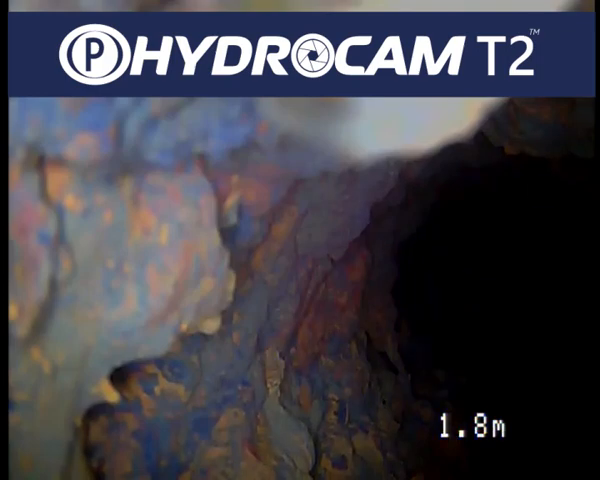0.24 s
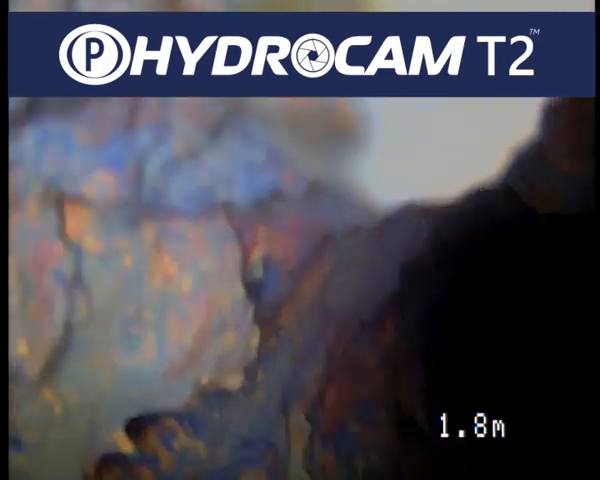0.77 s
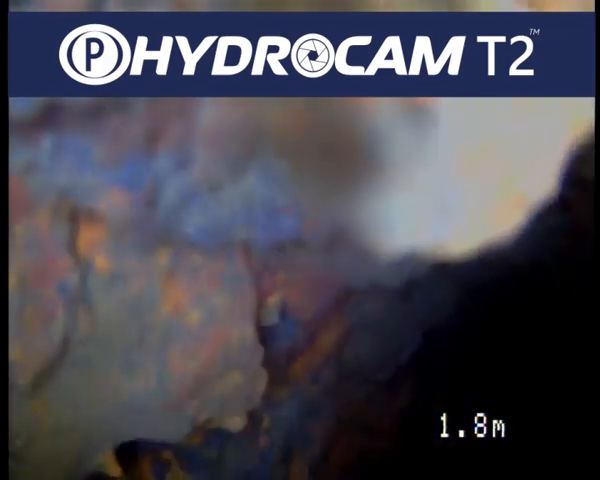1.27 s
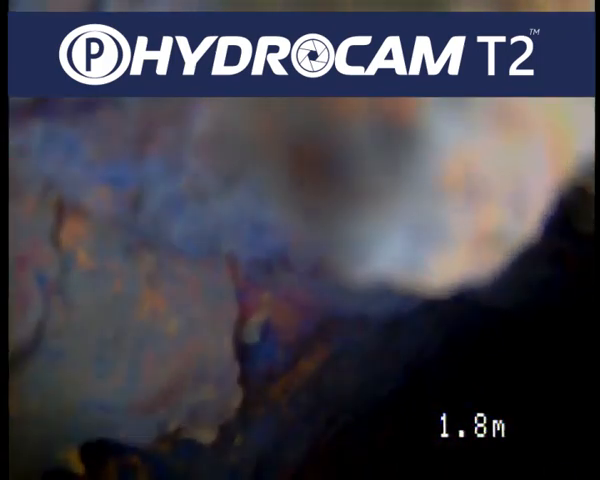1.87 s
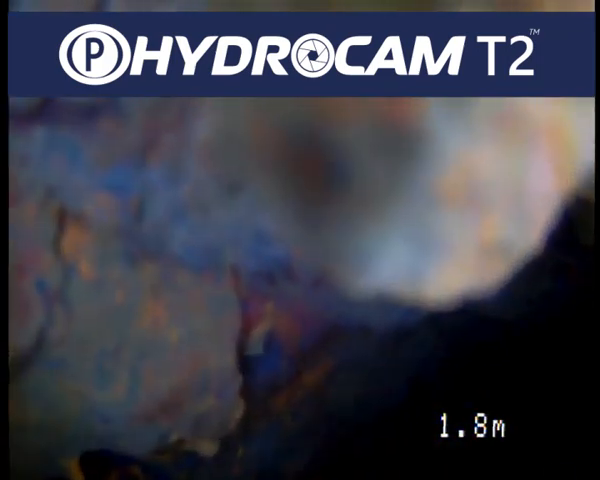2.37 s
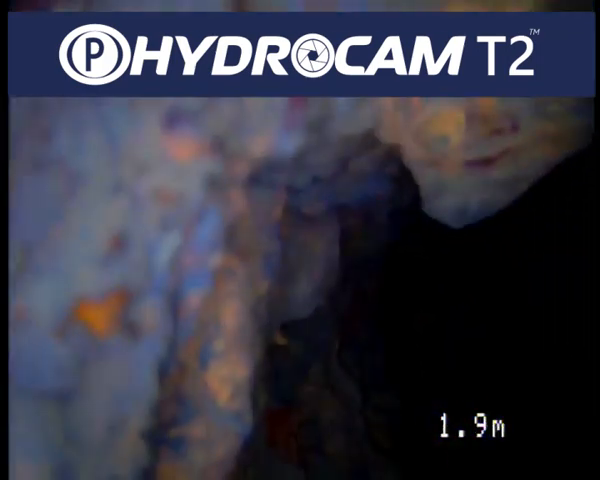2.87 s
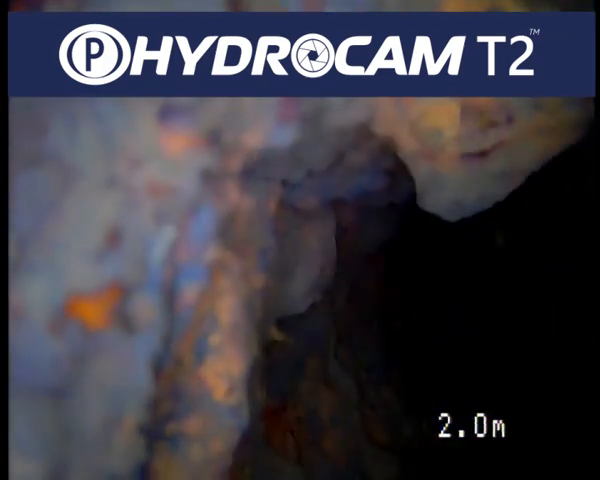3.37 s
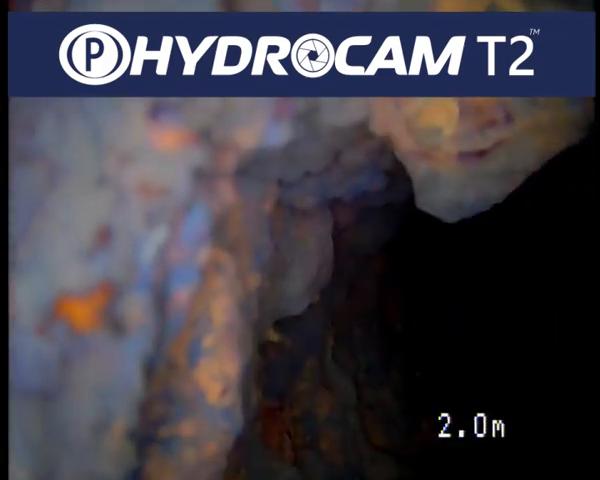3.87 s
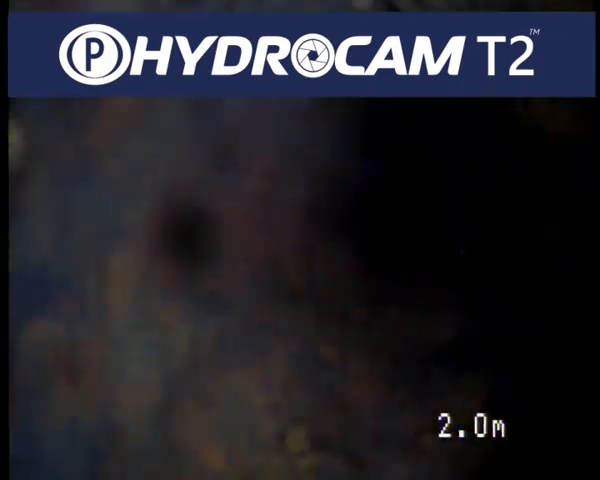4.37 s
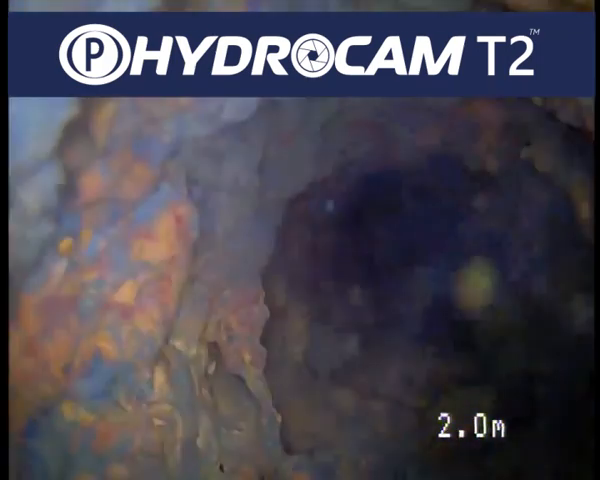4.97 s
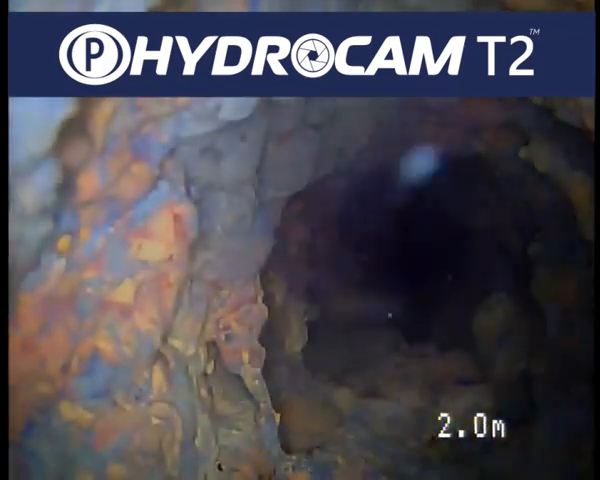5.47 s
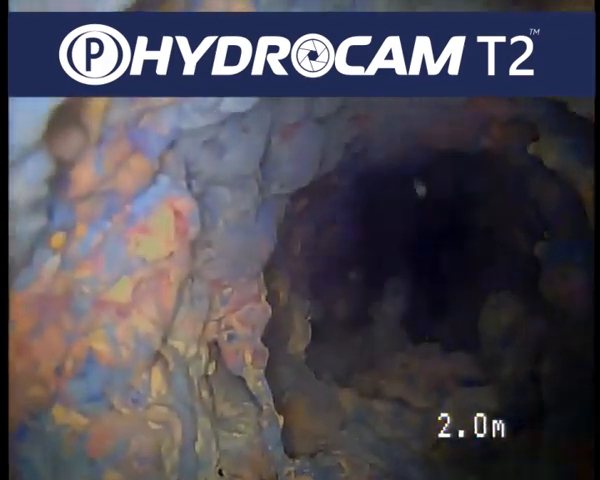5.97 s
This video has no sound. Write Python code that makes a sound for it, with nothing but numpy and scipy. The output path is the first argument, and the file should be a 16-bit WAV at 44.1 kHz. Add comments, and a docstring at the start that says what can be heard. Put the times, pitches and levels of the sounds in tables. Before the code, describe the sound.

A microphone on a probe pushed through a rough, rusty pipe picks up muffled low knocks, soft thumps and faint cable rumble. The blows are dry and woody, with a very short dull echo. After scattered light taps comes a rapid rattle of bumps, a pause, then the loudest crash, clipped and crunchy, with scraping grit and a stuttering slip. Hollow hiss remains, ended by a small bump and squeak.

```python
"""Dull knocks over a faint hollow hush come first: an inspection camera head is shoved through a corroded pipe.
Blows are damped rings, cracks and sharp overload ticks are filtered noise bursts, thumps are spring swings.
Sliding is a stream of ringing grains with dull grit and gliding squeaks; the cable is low coloured noise.
The bore returns a short diffuse echo, its air column resonates, and the microphone overloads on hard blows."""
import sys
import numpy as np
from scipy import signal
from scipy.fft import rfft, irfft
from scipy.io import wavfile

SR = 44100
rng = np.random.default_rng(int(sys.argv[2]) if len(sys.argv) > 2 else 0)


def int16_out(signal):
    """Quantize to a 16-bit WAV file."""
    q = np.round(np.clip(np.atleast_2d(signal).T, -1, 1) * 32767)
    wavfile.write(sys.argv[1], SR, q.astype(np.int16))


N = 274869
TIME = np.arange(N) / SR

# Head striking the crust, with a crack or, in the two rows at 8000 Hz and above, a sharp overload tick.
# Each row: start in seconds, ring peak in dB, ring frequency in Hz, ring t60 in seconds,
# crack or tick peak in dB, crack or tick frequency in Hz.
CRUST_KNOCKS = [(0.0944, -26.5, 388, 0.0074, -62, 1500), (0.2323, -34.5, 383, 0.0075, -62, 1500),
                (0.3442, -29.5, 457, 0.0035, -55, 990), (0.89, -22, 417, 0.0028, -50, 950),
                (0.9683, -18, 450, 0.0043, -58, 3500), (1.0216, -32, 500, 0.0022, -40, 1970),
                (1.025, -25.5, 736, 0.0017, -41, 1790), (1.3781, -25.5, 507, 0.0026, -47, 3300),
                (1.428, -27, 367, 0.0063, -54, 1500), (1.6598, -13, 455, 0.0057, -31, 1820),
                (1.6635, -32.5, 800, 0.0077, -49, 1100), (1.9485, -33, 510, 0.0031, -43, 2220),
                (2.0109, -27, 430, 0.0067, -42, 1030), (2.476, -26, 385, 0.0064, -55, 1500),
                (2.5531, -25.5, 427, 0.0088, -40.5, 1690), (2.6018, -5, 358, 0.0038, -28.5, 1440),
                (2.6228, -14, 590, 0.0066, -24, 1760), (2.7345, -19.5, 600, 0.0026, -55, 1500),
                (2.7444, -21, 506, 0.011, -41, 1500), (2.7533, -11, 390, 0.0059, -23, 1520),
                (2.771, -15, 860, 0.004, -26.5, 1500), (2.8048, -14, 562, 0.0044, -50, 1500),
                (2.8111, -5.5, 400, 0.0022, -34.5, 2550), (2.8262, -19.5, 604, 0.0026, -39, 1880),
                (2.8731, -15, 480, 0.004, -57, 1500), (2.8813, -3.5, 427, 0.0019, -28, 2950),
                (4.226, -28, 500, 0.0079, -60, 1500), (4.2975, -22.5, 520, 0.0043, -47, 1800),
                (4.3288, -23, 500, 0.0013, -18.5, 2290), (4.3318, 1.5, 603, 0.0037, -25, 1500),
                (4.3357, -7.5, 850, 0.00388, -14, 1800), (4.3612, -8, 427, 0.0078, -24, 8000),
                (4.3711, 0.5, 447, 0.0046, -8.5, 1900), (4.3765, -18, 418, 0.0035, -28, 1680),
                (4.3843, -10.5, 416, 0.0033, -33, 8500), (4.396, -16, 346, 0.0058, -38, 2000),
                (4.43, -29, 600, 0.005, -42, 2200), (4.447, -26, 545, 0.0027, -37, 1390),
                (4.4745, -14.5, 540, 0.0015, -40, 2680), (4.479, -7.5, 750, 0.003, -16.5, 1800),
                (4.505, -21, 630, 0.0052, -46, 1500), (4.5523, -12, 553, 0.0056, -30.5, 1750),
                (4.586, -19.5, 644, 0.002, -52, 1600), (4.8086, -22.5, 444, 0.0067, -55, 1500),
                (4.8269, -15, 465, 0.005, -45, 3000), (4.8539, -19.5, 470, 0.0034, -61, 1500),
                (6.2164, -17, 570, 0.0022, -46, 3000)]
# Modes of the camera housing. Each row: frequency in Hz, level in dB before the hardness factor, t60 in seconds.
HOUSING_MODES = [(800, -25.5, 0.031), (1056, -14, 0.011), (1416, -19.5, 0.0094), (2150, -62, 0.042)]
# Runs of slips over ridges. Each row: start in seconds, first slip level in dB, ring frequency in Hz,
# first gap in seconds, ratio of one gap to the last, loss in dB per slip, low-pass edge in Hz.
JUDDER_RUNS = [(2.9135, -16.5, 493, 0.0252, 0.8, 3, 1110), (4.7209, -18.5, 690, 0.0232, 0.89, 4, 1820)]
# Heavy contacts bouncing the head on its spring neck. Each row: start in seconds, peak in dB, frequency in Hz.
HEAD_THUMPS = [(0.004, -32.5, 62), (0.103, -29.5, 75), (0.347, -29, 118), (0.888, -28, 148),
               (0.966, -17.5, 100), (1.033, -29, 124), (1.663, -27.5, 79), (2.006, -24.5, 105),
               (2.602, -33, 108), (2.753, -22, 116), (2.811, -35, 93), (2.879, -27, 114), (3.617, -36, 65),
               (4.041, -31, 55), (4.329, 3, 135.6), (4.367, -4, 114), (4.553, -25, 124),
               (4.824, -28.5, 128), (5.158, -38.5, 167), (5.314, -36, 130), (6.217, -28.5, 101)]
# Pushes of head and cable. Each row: start in seconds, rise in seconds, hold in seconds,
# scrape level in dB, cable rumble level in dB, grain pitch in Hz.
HEAD_PUSHES = [(0.95, 0.03, 0.05, -58, -42, 540), (1.153, 0.24, 0.043, -59, -46, 450),
               (1.48, 0.13, 0.32, -81, -52.5, 400), (2.196, 0.2, 0.3, -51, -43.5, 403),
               (2.726, 0.046, 0.21, -49.5, -41, 560), (3.086, 0.02, 0.012, -47.5, -46.5, 320),
               (3.15, 0.056, 0.7, -74, -54.5, 400), (4.034, 0.041, 0.0094, -44.5, -44, 370),
               (4.115, 0.04, 0.07, -48.5, -52.5, 402), (4.196, 0.076, 0.61, -38, -42, 492),
               (6.07, 0.1, 0.08, -39, -46.5, 397)]
# Squeaks of wet scale. Each row: start in seconds, length in seconds, start frequency in Hz,
# end frequency in Hz, level of the fundamental in dB before roughening.
SCALE_SQUEAKS = [(4.827, 0.024, 1444, 1220, -44), (4.856, .022, 1150, 645, -37.5),
                 (6.193, 0.0213, 1500, 2150, -51), (6.217, 0.02, 1102, 1374, -43)]
# Spectrum of the cable rumble. Each row: frequency in Hz, relative density in dB per Hz.
CABLE_SPECTRUM = [(20, 1.5), (50, 1.5), (90, 4.5), (150, -1), (220, -3.5), (400, -35), (1500, -79)]
# Resonances of the air column. Each row: frequency in Hz, width in Hz, relative level in dB.
AIR_COLUMN_MODES = [(179.4, 17, -0.5), (333, 144, -4), (465, 54, -1.5), (598, 29, -3.5), (800, 30, -5),
                    (888, 122, -12), (1119.5, 17.6, -5), (1290, 260, -18.5), (1500, 79, -10)]
# Spectrum of the even hush and hiss. Each row: frequency in Hz, relative density in dB per Hz.
HUSH_SPECTRUM = [(25, -4.5), (60, 5), (150, -13), (260, -5), (500, -10), (900, -8.5), (1500, -24.5),
                 (1850, -27), (2400, -26), (5000, -28), (10000, -29), (11500, -40)]

REBOUND_S, REBOUND_DB = 0.00648, -14  # nominal delay; level relative to the knock
GRIND_DB, GRIND_DB_PER_S, GRIND_HZ = -27.5, 305, 424  # start level relative to the knock's peak
SHAKE_DB, SHAKE_DB_PER_S = -27, 113  # start level relative to the thump's peak
CABLE_REST_DB, CABLE_WAVER_DB = -63, 4  # the slack cable never lies quite still
STOP_DB_PER_S = 220  # fall of the sliding gain after a push
AIR_COLUMN_DB, HUSH_DB = -52, -55.5
CUTOFF_HZ = 11000  # upper limit of the microphone


def knocks(hard_hz=650, hardness_slope=3.8):
    """Impact excitation: the crust rings dully, and higher contacts excite the housing modes more strongly."""
    out = np.zeros(N)
    for s, db, hz, t60, *_ in CRUST_KNOCKS:
        ring = damped_ring(hz, t60)
        add(out, s, from_db(db) * ring)
        # the head falls back once
        rebound_s = REBOUND_S * rng.uniform(.7, 1.342)
        add(out, s + rebound_s, from_db(db + REBOUND_DB) * ring)
        hardness = (hz / hard_hz) ** hardness_slope
        strengths = from_db(db + rng.normal(0, 2.1, len(HOUSING_MODES))) * hardness
        for strength, (mode_hz, mode_db, mode_t60) in zip(strengths, HOUSING_MODES):
            add(out, s, strength * from_db(mode_db) * swing(mode_hz, mode_t60))
    return out


def slips(count=5, t60=0.0022, overtone_hz=880, overtone_t60=0.0074, overtone_db=-12):
    """Stick-slip: each jerk excites a damped ring and overtone, with gaps and levels shrinking along a run."""
    out = np.zeros(N)
    for s, db, hz, gap_s, gap_ratio, loss_db, top_hz in JUDDER_RUNS:
        ring = damped_ring(hz, t60)
        overtone = from_db(overtone_db) * damped_ring(overtone_hz, overtone_t60)
        slip = cut(ring + overtone, top_hz, "low", order=6)
        for k in range(count):
            elapsed_s = gap_s * np.sum(gap_ratio ** np.arange(k))
            add(out, s + elapsed_s, from_db(db - k * loss_db) * slip)
    return out


def thumps(t60=0.02, sway_hz=92, sway_t60=0.059, sway_db=-20, stop_db=-31):
    """Damped mass on a spring: the head swings briefly, and its neck sways on as far as the bore allows."""
    out = np.zeros(N)
    for s, db, hz in HEAD_THUMPS:
        bounce = from_db(db) * swing(hz, t60)
        sway = from_db(min(db + sway_db, stop_db)) * swing(sway_hz, sway_t60)
        add(out, s, bounce + sway)
    return out


def cracks_and_ticks(t60=0.015, relative_width=0.25, crumble_db=-22, soft_db=-33, edge=8.8, crush_t60=0.0047):
    """Impulsive noise: a crack or overload tick peaks at the knock's crest, sharper when stronger, and decays."""
    out, lead_s = np.zeros(N), .01
    t = TIME[:SR // 20] - TIME[int(lead_s * SR)]
    # the noise grows until the snap at t = 0 and dies away after it
    crumbs = from_db(crumble_db - 60 * np.maximum(t / t60, -t / crush_t60))
    for s, _, _, ring_t60, db, hz in CRUST_KNOCKS:
        snap = (t == 0) + crumbs * rng.standard_normal(len(t))
        sharpness = max(1, from_db(db - soft_db))
        edge_hz = min(edge * hz * sharpness, SR / 3)
        burst = cut(resonate(snap, hz, relative_width * hz), edge_hz, "low")
        burst = burst / np.abs(burst).max()
        add(out, s + crest_time(ring_t60) - lead_s, from_db(db) * burst)
    return out


def scrape(grains_per_s=4000, relative_width=0.058, spread_octaves=0.47, top_hz=1450,
           catch_db=3.0, catch_hz=55):
    """Rough-surface friction: dense collisions excite resonances around the grain pitch of the motion."""
    level, pitch_hz = sliding_motion()
    # the head catches and frees itself, so the scrape comes in clumps
    catch = from_db(catch_db * waver(catch_hz))
    grains = (rng.random(N) < grains_per_s / SR) * rng.choice([-1, 1], N)
    pitches = np.geomspace(200, 1800, 24)
    # each grain is dealt to one resonance
    dealt = rng.integers(0, len(pitches), N)
    out, power = np.zeros(N), np.zeros(N)
    for k, hz in enumerate(pitches):
        share = np.exp(-.5 * (np.log2(hz / pitch_hz) / spread_octaves) ** 2)
        ringing = resonate(grains * (dealt == k), hz, relative_width * hz)
        out += np.sqrt(share) * rms_one(ringing)
        power += share
    return level * rms_one(catch) * cut(out / np.sqrt(power), top_hz, "low", order=6)


def grit(specks_per_s=170, size_db=9.5, level_db=-25, centre_hz=1550, width_hz=500, top_hz=1950):
    """Sparse random impulses: loose specks of rust of uneven size crackle dully under the sliding head."""
    level, _ = sliding_motion()
    sizes = from_db(size_db * np.minimum(rng.exponential(1, N), 4))
    specks = (rng.random(N) < specks_per_s / SR) * rng.choice([-1, 1], N) * sizes
    crackle = cut(resonate(specks, centre_hz, width_hz), top_hz, "low", order=6)
    return from_db(level_db) * level * rms_one(crackle)


def squeaks(rough=0.4, octave_db=-25):
    """Friction oscillation: the contact locks into a rough gliding tone with a weak octave."""
    out = np.zeros(N)
    for s, length_s, start_hz, end_hz, db in SCALE_SQUEAKS:
        size = int(length_s * SR)
        phase = 2 * np.pi * np.cumsum(np.linspace(start_hz, end_hz, size)) / SR
        roughness = rms_one(cut(rng.standard_normal(size), 300, "low"))
        grip = signal.windows.tukey(size, .5) * (1 + rough * roughness)
        tone = np.sin(phase) + from_db(octave_db) * np.sin(2 * phase)
        add(out, s, from_db(db) * grip * tone)
    return out


def cable(waver_hz=6):
    """Broadband friction: low noise follows the summed power of pushes, thump shakes and faint rest motion."""
    gains = [from_db(db) * push(start, rise_s, hold_s) for start, rise_s, hold_s, _, db, _ in HEAD_PUSHES]
    gains += [dying(s, db + SHAKE_DB, SHAKE_DB_PER_S) for s, db, _ in HEAD_THUMPS]
    gains.append(from_db(CABLE_REST_DB + CABLE_WAVER_DB * waver(waver_hz)))
    return np.sqrt(sum(g ** 2 for g in gains)) * coloured_noise(CABLE_SPECTRUM)


def pipe_echo(x, t60=0.038, wet_db=-14, wall_hz=1400, delay_s=0.00047):
    """Diffuse reflection: blows scatter back from the rough bore as a short, dull, decaying tail."""
    t = TIME[:SR // 4]
    tail = rng.standard_normal(len(t)) * from_db(-60 * t / t60) * (t > delay_s)
    tail = cut(tail / np.sqrt(np.sum(tail ** 2)), wall_hz, "low")
    return from_db(wet_db) * signal.fftconvolve(x, tail)[:N]


def pipe_hush():
    """Air-column resonance: faint noise excites the modes of the pipe, over an even hush and hiss."""
    air = sum(from_db(db) * resonate(rng.standard_normal(N), hz, width) for hz, width, db in AIR_COLUMN_MODES)
    column = rms_one(cut(air, 2010, "low", order=4))
    return from_db(AIR_COLUMN_DB) * column + from_db(HUSH_DB) * coloured_noise(HUSH_SPECTRUM)


def sliding_motion():
    """Power addition: pushes and the grinding after knocks set the scrape level and power-weighted grain pitch."""
    slides = []
    for start, rise_s, hold_s, db, _, hz in HEAD_PUSHES:
        slides.append(((from_db(db) * push(start, rise_s, hold_s)) ** 2, hz))
    grind, fade = np.zeros(N), from_db(-GRIND_DB_PER_S * TIME[:SR // 2])
    for s, db, *_ in CRUST_KNOCKS:
        add(grind, s, (from_db(db + GRIND_DB) * fade) ** 2)
    slides.append((grind + 1e-18, GRIND_HZ))
    power = sum(p for p, _ in slides)
    return np.sqrt(power), sum(p * hz for p, hz in slides) / power


def push(start, rise_s, hold_s):
    """Driven sliding: the gain rises evenly to 1, holds, and falls exponentially as the push stops."""
    rise = np.clip((TIME - start) / rise_s, 0, 1)
    return rise * from_db(-STOP_DB_PER_S * np.clip(TIME - start - rise_s - hold_s, 0, 1))


def dying(s, db, db_per_s):
    """Exponential decay: a gain jumps to db at time s and falls away."""
    return (TIME >= s) * from_db(db - np.clip(db_per_s * (TIME - s), 0, 120))


def crest_time(t60):
    """Envelope maximum: seconds from the start of a damped ring to its strongest swing."""
    return 2 * t60 / np.log(1000)


def damped_ring(hz, t60):
    """Soft contact: the ring swells to one strong inward swing of size 1 and is soon damped."""
    t, crest_s = TIME[:SR // 16], crest_time(t60)
    envelope = (t / crest_s * np.exp(1 - t / crest_s)) ** 2
    return -np.cos(2 * np.pi * hz * (t - crest_s)) * envelope


def swing(hz, t60):
    """Damped oscillation: a mass on a spring is pushed from rest; peak 1."""
    t = TIME[:SR // 4]
    motion = t * np.sin(2 * np.pi * hz * t) * from_db(-60 * t / t60)
    return motion / np.abs(motion).max()


def resonate(x, hz, width_hz):
    """Two-pole resonance of the given bandwidth, with gain near 1 on top."""
    r = np.exp(-np.pi * width_hz / SR)
    zeros = np.array([1, 0, -1]) * (1 - r * r) / 2
    poles = [1, -2 * r * np.cos(2 * np.pi * hz / SR), r * r]
    return signal.lfilter(zeros, poles, x + 1e-18)


def coloured_noise(spectrum):
    """Spectral shaping: steady random noise takes the given spectrum; rms 1."""
    hz, db = np.transpose(spectrum)
    bins = np.maximum(np.arange(N // 2 + 1) * SR / N, 1)
    gain = from_db(np.interp(np.log(bins), np.log(hz), db))
    return rms_one(irfft(rfft(rng.standard_normal(N)) * gain, N))


def waver(hz):
    """Low-passed noise: a slow random fluctuation of rms 1."""
    return rms_one(cut(rng.standard_normal(N), hz, "low"))


def cut(x, hz, kind, order=2):
    """Butterworth filter, flat in its pass band."""
    return signal.sosfilt(signal.butter(order, hz, kind, fs=SR, output="sos"), x)


def from_db(db):
    """Logarithmic level: decibels to amplitude gain."""
    return 10 ** (np.asarray(db) / 20)


def rms_one(x):
    """Normalisation to unit rms amplitude."""
    return x / np.sqrt(np.mean(x ** 2) + 1e-20)


def add(track, s, sound):
    """Superposition: mix a sound into the track from time s on."""
    i = max(0, int(s * SR))
    track[i:i + len(sound)] += sound[:max(0, N - i)]


def scene():
    """Superposition of blows and their echo, sliding, and the pipe itself."""
    blows = knocks() + slips()
    sliding = scrape() + grit() + squeaks() + cable()
    return (blows + pipe_echo(blows) + thumps() + cracks_and_ticks() + sliding + pipe_hush())[None]


def record(dry):
    """Asymmetric overload: upward swings round off, downward ones flatten; deep bass and top are cut."""
    top, bottom, bass_hz = .55, -.24, 16
    clipped = np.maximum(top * np.tanh(dry / top), bottom)
    return cut(cut(clipped, bass_hz, "high", order=1), CUTOFF_HZ, "low", order=20)


dry = scene()
out = record(dry)
int16_out(out)
```